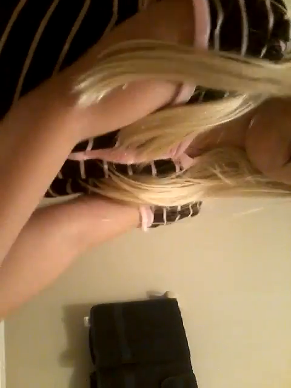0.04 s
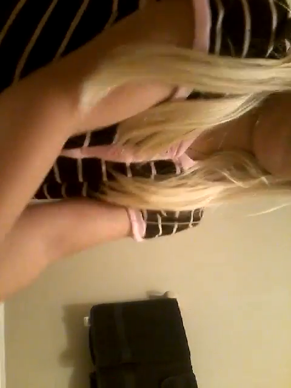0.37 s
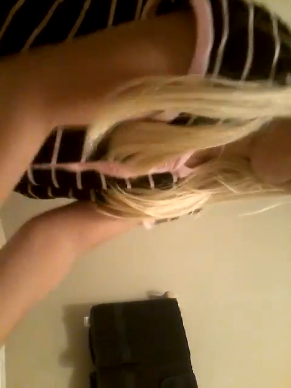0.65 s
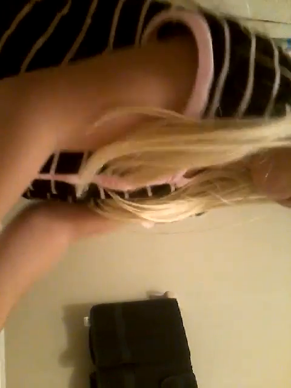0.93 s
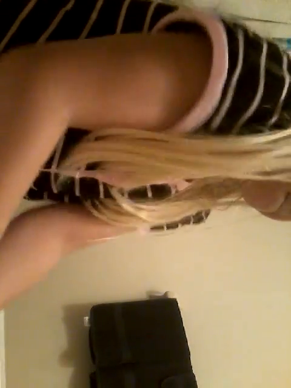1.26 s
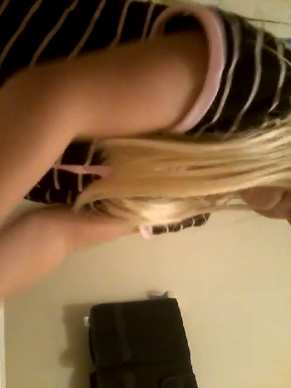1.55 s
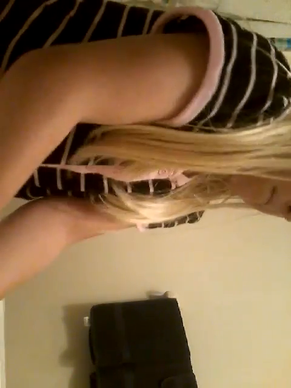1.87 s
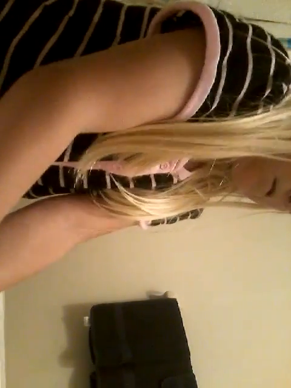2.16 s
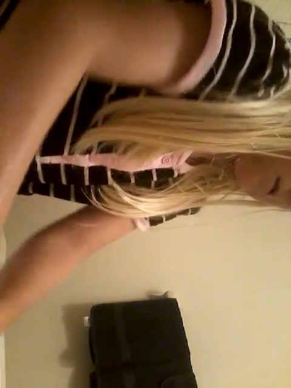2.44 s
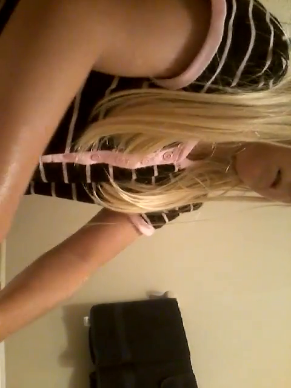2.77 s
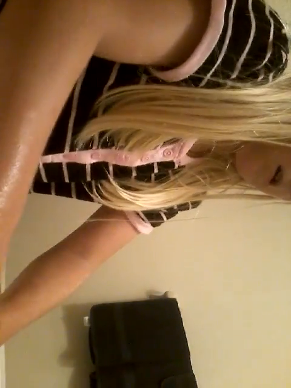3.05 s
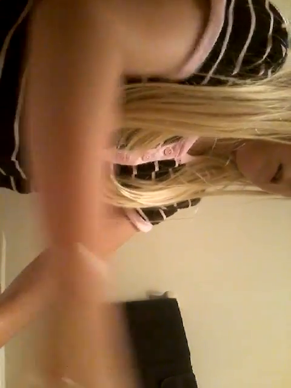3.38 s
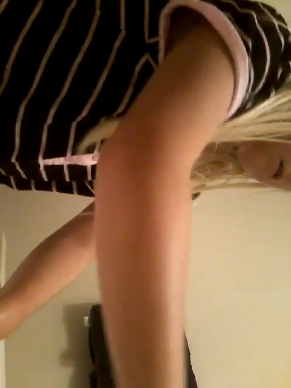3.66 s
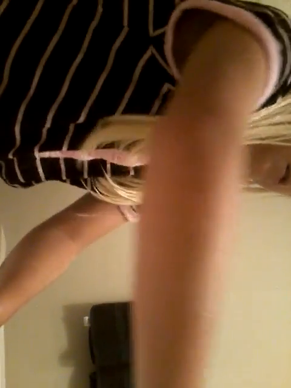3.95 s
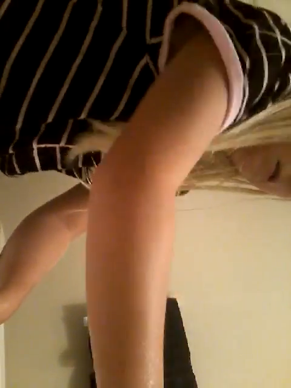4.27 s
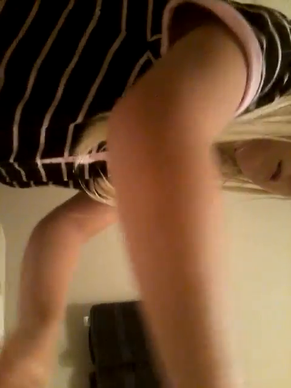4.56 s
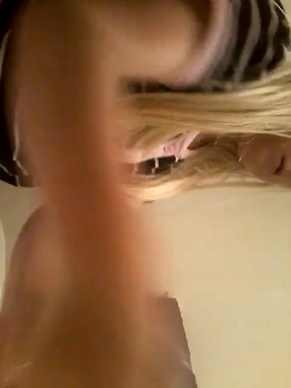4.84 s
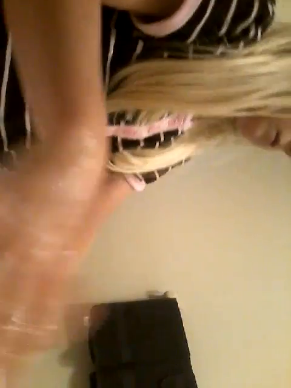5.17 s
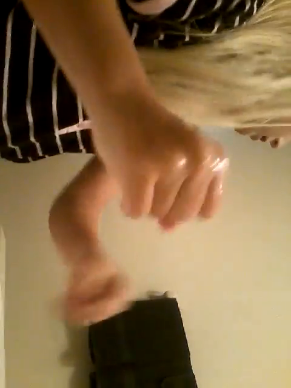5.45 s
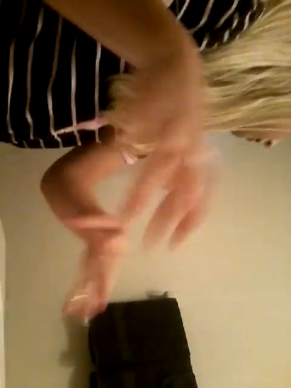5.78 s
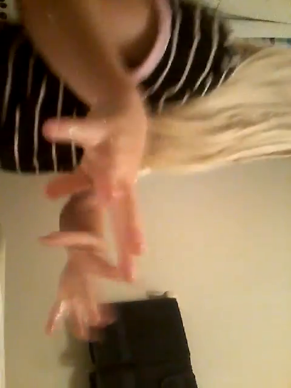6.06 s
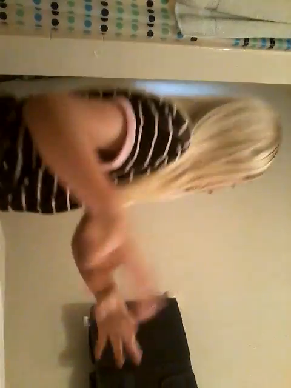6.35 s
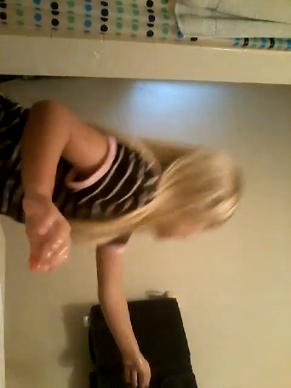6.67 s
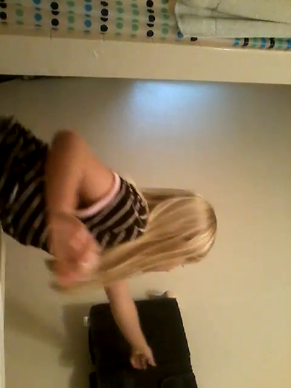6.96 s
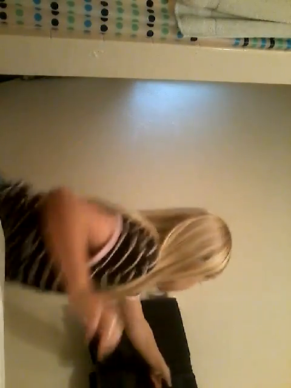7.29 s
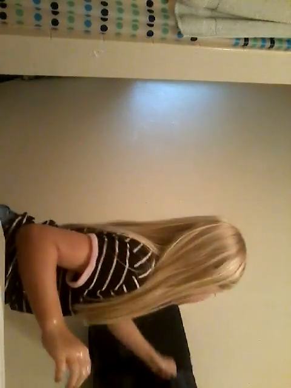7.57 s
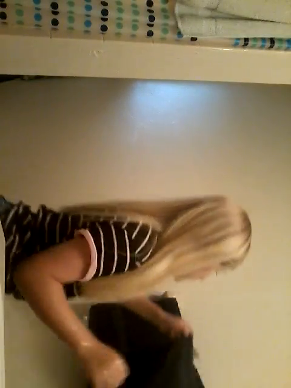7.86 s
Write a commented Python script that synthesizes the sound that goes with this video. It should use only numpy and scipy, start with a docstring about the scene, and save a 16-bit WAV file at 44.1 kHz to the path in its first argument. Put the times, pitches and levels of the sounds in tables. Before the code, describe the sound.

From the start, tap water spatters and drums steadily on a basin, heard close up in a small bathroom with a short echo. Hands rinse under it with irregular splashes, bubbles and wet squelches, and something knocks the basin at about 1 second. The loudest moment comes around 2 seconds, when a handful of water drops with a hollow slosh and sharp spurts. Between 3.7 and 4.7 seconds the tap handles give several dull clunks. The flow falls away at 4 seconds, leaving drips and a soft drain gurgle until about 5. Shaken hands then flick drops that tick right by the microphone, from 5.3 to 6.2 seconds, with very faint rubbing. Near 7.6 seconds a wall fitting judders with a quick run of ringing clacks and a tiny groan, along with a soft towel rustle. A faint hiss and low hum lie underneath throughout.

```python
"""A small bathroom with hard walls: hands are rinsed under a tap, close to a phone on the counter.
The jet spatters and drums on the basin, handfuls of water splash, and trapped air rings as bubbles.
The tap is shut, the last water drips and drains, and shaken hands flick drops beside the phone.
As the towel is reached for, a wall fitting judders and groans. Under it all lie a faint hiss and hum."""
import sys
import numpy as np
from scipy import signal
from scipy.fft import rfft, irfft
from scipy.io import wavfile
from scipy.ndimage import uniform_filter1d

SR = 44100
rng = np.random.default_rng(int(sys.argv[2]) if len(sys.argv) > 2 else 0)


def dump(signal):
    """Clip the signal to [-1, 1] and save it as 16-bit WAV at the path in sys.argv[1]."""
    limited = np.clip(np.atleast_2d(signal).T, -1, 1)
    pcm = np.round(limited * 32767).astype(np.int16)
    wavfile.write(sys.argv[1], SR, pcm)


N = 349272
TIME = np.arange(N) / SR
TOP_HZ = 15950  # the highest pitch the phone picks up


def undb(db):
    """Turn decibels into a number to multiply by."""
    return 10 ** (np.asarray(db) / 20)


def unit(x):
    """Scale a sound to an average strength (rms) of 1."""
    return x / np.sqrt(np.mean(x ** 2))


def at_level(x, db, size=110):
    """Scale a short sound so that its loudest few milliseconds have this level."""
    return x * undb(db) / np.sqrt(uniform_filter1d(x ** 2, size, mode="constant").max())


def add(out, start, x):
    """Mix x into out, beginning at start seconds."""
    i = int(start * SR)
    out[i:i + len(x)] += x[:N - i]


def colour(x, tone, size=4096):
    """Make some pitches louder and others softer, along a curve of (f/Hz, gain/dB) points."""
    hz, db = np.transpose(tone)
    log_gain = np.log(undb(np.interp(np.log(np.fft.rfftfreq(size, 1 / SR) + 1), np.log(hz), db)))
    cepstrum = irfft(log_gain)
    cepstrum[1:size // 2] *= 2  # folded so that the filter never sounds ahead of a hit
    cepstrum[size // 2 + 1:] = 0
    return signal.fftconvolve(x, irfft(np.exp(rfft(cepstrum))))[:len(x)]


def ring(x, hz, width):
    """Let a sound ring at one pitch; a narrower width rings longer."""
    return signal.lfilter(*signal.iirpeak(hz, hz / width, fs=SR), x)


def keep_side(x, hz, kind, order=2):
    """Keep the "low" or the "high" side of a cutoff pitch."""
    return signal.sosfilt(signal.butter(order, min(hz, TOP_HZ), kind, fs=SR, output="sos"), x)


def wander(rate):
    """A smooth random curve that takes a new value about rate times a second."""
    hold = int(SR / rate)
    steps = np.repeat(rng.standard_normal(N // hold + 1), hold)
    return unit(uniform_filter1d(uniform_filter1d(steps, hold), hold)[:N])


def impacts(n, per_second, spread_db):
    """Tiny hits at random moments, a few much larger than the rest."""
    size_db = spread_db * np.minimum(rng.exponential(size=n), 4)
    return (rng.random(n) < per_second / SR) * rng.choice([-1, 1], n) * undb(size_db)


def burst(fade):
    """A ragged burst of droplets that starts at once and dies away in clumps."""
    t = TIME[:SR // 5]
    swell = np.exp(-t / fade) * (1 - np.exp(-t / .0007))
    clumps = np.interp(t, t[::130], rng.standard_normal(len(t[::130])))
    return impacts(len(t), 6000, 1.8) * swell * undb(1.5 * clumps)


def bubble(hz, t60, rise=0.093):
    """An air pocket rings and rises in pitch as it surfaces; t60 is the seconds it takes to fade 60 dB."""
    t = TIME[:SR // 10]
    pitch = hz * (1 + rise * np.minimum(t / t60, 1))
    return np.sin(2 * np.pi * np.cumsum(pitch) / SR) * undb(-60 * t / t60)


def pop(hz, t60, db, scatter):
    """A trapped air pocket bursts and breaks into six smaller ones of nearby pitch."""
    cluster = bubble(hz, t60)
    for lag, detune in rng.random((6, 2)):
        piece = bubble(hz * (1 + scatter) ** (2 * detune - 1), t60)
        cluster += np.exp(-lag) * np.roll(piece, int(lag * t60 * 0.66 * SR))
    # a bubble gives off little sound far from its pitch
    return at_level(keep_side(keep_side(cluster, hz, "high", order=3), 1.5 * hz, "low"), db)


def gurgle(start, end, low_hz, high_hz, start_db, end_db, cycles, count):
    """Lone bubbles of all sizes, scattered over a stretch of time."""
    out = np.zeros(N)
    for when, pitch, size in rng.random((count, 3)):
        hz = low_hz * (high_hz / low_hz) ** pitch
        db = start_db + (end_db - start_db) * when - 14 * np.sqrt(size)
        add(out, start + (end - start) * when, undb(db) * bubble(hz, cycles / hz))
    return out


def cloud(length, low_hz, high_hz, cycles, count):
    """A short, dense swarm of bubbles between two pitches."""
    out = np.zeros(SR // 2)
    for k, (when, pitch, size) in enumerate(rng.random((count, 3))):
        hz = low_hz * (high_hz / low_hz) ** pitch
        add(out, length * (k + when) / count, undb(-10 * size) * bubble(hz, cycles / hz))
    return out


def room(x, echo_db=-4.5, low_t60=0.43, treble_t60=0.28):
    """The sound plus dense echoes from near walls; the treble dies a little sooner."""
    t = TIME[:SR // 2]
    noise = rng.standard_normal(len(t))
    low = keep_side(noise, 1400, "low", order=1)
    tail = low * undb(-60 * t / low_t60) + (noise - low) * undb(-60 * t / treble_t60)
    tail *= np.clip(t / 0.0059 - .5, 0, 1)  # the first echoes take a moment to arrive
    return x + undb(echo_db) * signal.fftconvolve(x, tail / np.sqrt(np.sum(tail ** 2)))[:N]


def air():
    """Faint hiss and a low, wavering hum at a pitch where the room rings."""
    # tone of the hiss: f/Hz, gain/dB
    hiss_tone = [(15, -43.5), (25, -12), (43, -20.5), (110, -4.5), (133, 2), (184, -9.5), (361, -13.5),
                 (710, -29), (1590, -33.5), (2090, -32.5), (3050, -36.5), (6660, -33), (8270, -37),
                 (14600, -40.5), (15800, -44.5)]
    hiss = unit(colour(rng.standard_normal(N), hiss_tone)) * undb(-55)
    hum = unit(ring(ring(rng.standard_normal(N), 134, 22), 134, 22))
    running = np.interp(TIME, [3.4, 5.0], [1, 0])  # running water feeds the hum
    return hiss + hum * undb(-61 + 16.4 * running)


def rubbing():
    """Wet hands, sleeves and towel slide in tiny random slips, each stroke swelling and fading."""
    # strokes: middle t/s, level/dB, half length/s
    strokes = [(4.958, -58.5, 0.041), (5.219, -63.5, 0.099), (5.714, -62, 0.13), (6.876, -65, 0.056),
               (7.414, -60, 0.055), (7.665, -50.5, 0.03), (7.767, -52, 0.14)]
    # tone of the rustle: f/Hz, gain/dB
    rustle_tone = [(300, 3.5), (1000, -3), (2200, -12.5), (4000, -8.5), (6800, 2.5), (8500, -10.5),
                   (15000, -19)]
    swell = sum(undb(db) * np.exp(-((TIME - middle) / half) ** 2) for middle, db, half in strokes)
    return unit(colour(room(impacts(N, 2500, 2.1)), rustle_tone)) * swell


def fitting_groan():
    """The wall fitting's joint rubs as it turns, with a soft tone that sags and rises again."""
    # course of the groan: t/s, f/Hz, level/dB
    course = [(7.648, 613, -62), (7.658, 542, -50), (7.677, 495, -47), (7.703, 508, -49), (7.728, 585, -62)]
    times, hz, db = np.transpose(course)
    phase = 2 * np.pi * np.cumsum(np.interp(TIME, times, hz)) / SR
    return unit(np.sin(phase)) * np.interp(TIME, times, undb(db), left=0, right=0)


def fitting_judder():
    """The wall fitting is pulled and catches several times; each catch clacks and sets it ringing."""
    # catches: t/s, level/dB
    catches = [(7.642, -37), (7.6465, -39.5), (7.653, -32.5), (7.668, -38), (7.683, -46), (7.696, -44),
               (7.754, -53)]
    # pitches the fitting rings at: f/Hz, width/Hz, gain/dB
    fitting_notes = [(139, 5, 8), (209, 20, 7.5), (254, 4.7, 8), (360, 52, -4.5), (770, 39, -12),
                     (1000, 41, -21), (1275, 9.5, -8), (2230, 50, -11), (2840, 35, -10), (3560, 30, -14),
                     (4130, 40, -11), (4690, 47, -12)]
    out, t = np.zeros(N), TIME[:SR // 2]
    for start, db in catches:
        scrape = rng.standard_normal(len(t)) * np.exp(-t / 0.0047)
        push = scrape + 3 * np.sqrt(np.sum(scrape ** 2)) * (t == 0)
        body = sum(undb(gain) * ring(push, hz, width) for hz, width, gain in fitting_notes)
        clack = undb(-14) * keep_side(keep_side(scrape, 5000, "low", order=3), 2200, "high")
        add(out, start, at_level(keep_side(body + clack, 65, "high", order=3), db))
    return out


def flicks(gap_s=0.0099, trail_db=-13.5, loss_db=2):
    """Drops flicked beside the phone tick without echo; three ever softer droplets trail each one."""
    # landings: t/s, level/dB, treble cutoff/Hz
    landings = [(5.272, -41.5, 6000), (5.309, -55.5, 2500), (5.654, -59, 12000), (5.701, -48.5, 14800),
                (5.752, -52, 2510), (6.146, -46, 3960), (6.1485, -31.5, 2780), (6.1684, -32.5, 8860),
                (6.205, -48.5, 4940)]
    # tone of a very near drop: f/Hz, gain/dB
    drop_tone = [(100, -16.5), (400, -2.5), (1000, -4.5), (2000, -3), (3200, -10.5), (6000, -1.5),
                 (8000, -8), (16000, -17)]
    out, t = np.zeros(N), TIME[:SR // 20]
    for start, db, cutoff in landings:
        lags = np.cumsum(gap_s * (.5 + rng.random(3)))
        trail = [(lag, trail_db - k * loss_db) for k, lag in enumerate(lags)]
        for lag, drop_db in [(0.0011, 0.0024)] + trail:
            fade = np.exp(-t / 0.00066) + undb(-19) * np.exp(-t / 0.011)
            tick = colour(rng.standard_normal(len(t)) * fade, drop_tone)
            add(out, start + lag, at_level(keep_side(tick, cutoff, "low"), db + drop_db))
    return out


def tap_knocks():
    """The tap's handles give short, dead clunks as they are gripped and turned to their stops."""
    # clunks: t/s, level/dB, treble cutoff/Hz
    clunks = [(3.723, -29, 270), (3.774, -36, 304), (4.2449, -27.5, 1300), (4.595, -42, 900),
              (4.641, -34.5, 2970), (4.667, -35, 1100)]
    # tone of a knocked handle: f/Hz, gain/dB
    handle_tone = [(70, -12), (150, 2.5), (400, 0.5), (800, -4.5), (1200, -2.5), (1600, -17), (3800, -16),
                   (7000, -12)]
    out, t = np.zeros(N), TIME[:SR // 10]
    for start, db, cutoff in clunks:
        blow = rng.standard_normal(len(t)) * np.exp(-t / 0.004)
        blow[0] += 8  # the sharp first contact
        add(out, start, at_level(keep_side(colour(blow, handle_tone), cutoff, "low", order=1), db))
    return out


def basin_knocks():
    """Hands and water hit the basin and counter; the basin rings, after soft blows only at low pitches."""
    # blows: t/s, level/dB, treble cutoff/Hz
    blows = [(0.636, -30, 190), (.762, -31.5, 139), (1.0507, -17, 4000), (1.060, -27, 3500),
             (1.368, -28.5, 161), (1.455, -30.5, 220), (3.445, -37, 150), (4.16, -40.5, 298)]
    # pitches the basin rings at: f/Hz, width/Hz, gain/dB
    basin_notes = [(127, 33.6, 4), (223, 59, 1), (355.5, 59, 2), (485, 17, -3), (980, 50, 1), (1184, 31, 8),
                   (1715, 35, -4.5), (2000, 70, -0.5), (2940, 60, 5), (3260, 70, 5)]
    out, t = np.zeros(N), TIME[:SR // 3]
    for start, db, cutoff in blows:
        fade = 0.0049 * (150 / cutoff) ** 0.35  # harder blows are shorter
        push = rng.standard_normal(len(t)) * np.exp(-t / fade)
        push[0] += 2.2 * np.sqrt(np.sum(push ** 2))
        body = sum(undb(gain) * ring(push, hz, width) for hz, width, gain in basin_notes)
        knock = keep_side(body + undb(-34) * push, cutoff, "low")
        add(out, start, at_level(keep_side(knock, 115, "high", order=6), db, size=300))
    return out


def gulps():
    """Large air pockets give short, low, hollow notes, in a dumped handful and later in the drain."""
    # air pockets: t/s, level/dB, f/Hz
    pockets = [(1.932, -25, 373.5), (2.030, -24, 365), (2.031, -27, 477), (4.560, -44, 280),
               (4.602, -37.5, 253)]
    out = np.zeros(N)
    for start, db, hz in pockets:
        add(out, start, pop(hz, t60=0.059, db=db, scatter=0.046))
    return out


def drips(cycles=40):
    """Each drop traps a bubble that rings for the same number of cycles, so high plinks are shorter."""
    # drops: t/s, level/dB, f/Hz
    drops = [(.760, -27, 2105), (1.125, -29.5, 2020), (1.558, -35, 2020), (1.572, -36, 2290),
             (2.001, -31, 2064), (2.009, -31, 3290), (2.016, -26, 4130), (2.695, -37.5, 2315),
             (4.261, -50, 12400), (4.287, -37.5, 5650), (4.453, -31.5, 5670), (4.541, -52, 6300),
             (4.612, -50, 3550), (4.666, -49, 4560), (4.724, -52.5, 2060), (4.748, -49, 5400)]
    out = np.zeros(N)
    for start, db, hz in drops:
        add(out, start, pop(hz, cycles / hz, db, scatter=.04))
    return out


def pool():
    """Bubbles burst in the water under the tap, then thin out as it drains."""
    running = gurgle(0, 4, 1800, 7500, start_db=-34, end_db=-33, cycles=36, count=260)
    filling = gurgle(2.6, 4, 1100, 4500, start_db=-34, end_db=-33, cycles=30, count=70)
    foam = gurgle(3.4, 4.06, 8500, 14000, start_db=-35, end_db=-31, cycles=50, count=220)
    last_foam = gurgle(4.05, 4.7, 9000, 13000, start_db=-41, end_db=-47, cycles=80, count=16)
    draining = gurgle(4.25, 4.8, 1900, 5500, start_db=-43, end_db=-40, cycles=35, count=36)
    glugs = gurgle(4.62, 4.82, 260, 2000, start_db=-40, end_db=-47, cycles=12, count=24)
    return running + filling + foam + last_foam + draining + glugs


def bubble_swarms(pitch_spread=1.3):
    """A dumped handful sloshes with large bubbles, cupped hands gurgle and foam fizzes."""
    # the stream runs into cupped hands: t/s, level/dB, length/s, middle f/Hz
    pours = [(0.552, -34.5, 0.047, 4250), (0.622, -36.5, 0.033, 6230), (2.70, -37, 0.13, 3620),
             (3.136, -31.5, .03, 6400), (3.391, -38.5, 0.044, 5100)]
    # whipped-up foam bursts in tiny bubbles: t/s, level/dB, length/s
    fizzes = [(1.78, -26, .008), (1.922, -30, .03), (2.048, -21.5, 0.054), (3.913, -30.5, 0.023)]
    out = gurgle(2.03, 2.09, 900, 1230, start_db=-12.5, end_db=-25.5, cycles=35, count=16)  # the slosh
    for start, db, length, hz in pours:
        swarm = cloud(length, hz / pitch_spread, hz * pitch_spread, cycles=30, count=20)
        add(out, start, at_level(swarm, db))
    for start, db, length in fizzes:
        add(out, start, at_level(cloud(length, 8500, 13500, cycles=41, count=50), db))
    return out


def squelches():
    """Wet palms squeeze out air; their hollow rings at three pitches, the higher ones dying sooner."""
    # squeezes: t/s, level/dB, low f/Hz, middle f/Hz, high f/Hz, t60/s, treble lift/(dB per octave)
    squeezes = [(.759, -24, 2120, 3200, 5200, 0.0097, 3.5), (1.051, -17.5, 2030, 3080, 5200, .012, 2.5),
                (1.342, -28.5, 2530, 3760, 6430, 0.0076, 2.5),
                (1.666, -14.5, 2200, 3020, 5400, 0.0066, 4.5), (2.160, -18, 2600, 3880, 6060, 0.0072, 13),
                (4.046, -33, 2470, 3110, 6100, .008, 2)]
    # strength of the hollow's low, middle and high note: gain/dB
    note_gains = [-3, 0, -3]
    out = np.zeros(N)
    for start, db, low_hz, middle_hz, high_hz, t60, lift in squeezes:
        scatter = .0014 / t60  # shorter squelches are less clear in pitch
        notes = sum(pop(hz, t60 * np.sqrt(low_hz / hz), gain + lift * np.log2(hz / low_hz), scatter)
                    for hz, gain in zip((low_hz, middle_hz, high_hz), note_gains))
        add(out, start, at_level(notes, db))
    return out


def splashes(splat_fade_s=0.005, splat_width_hz=1800):
    """A splash is a bright spray plus a duller slap; spurts are finer spray, splats a thin spit of it."""
    # water thrown off the hands: t/s, spray level/dB, slap level/dB, fade/s
    throws = [(.775, -24, -41, 0.0033), (0.931, -23.5, -37, 0.0067), (1.021, -27.5, -34.5, 0.025),
              (1.201, -24, -42, 0.014), (1.261, -20, -46, 0.0035), (1.455, -28, -34, 0.028),
              (1.666, -24, -31, 0.0032), (1.784, -21, -31.5, 0.014), (1.893, -23.5, -27.5, 0.022),
              (1.930, -21.5, -31, 0.033), (2.015, -24, -35, 0.011), (2.029, -16, -27, 0.017),
              (2.146, -16, -25.5, 0.0029), (2.2966, -21, -24.5, 0.005), (2.304, -18, -22, 0.0021),
              (3.773, -27.5, -42, 0.0045), (3.912, -30, -52, .005), (4.047, -29.5, -65, 0.01),
              (4.118, -24.5, -61, 0.0088), (4.452, -37, -56, .004), (4.558, -35, -52, 0.0023),
              (4.639, -40.5, -39, 0.0018)]
    # water squeezed out between the hands: t/s, level/dB, fade/s
    spurts = [(2.053, -20.5, 0.035), (2.083, -18, 0.024), (2.106, -13, 0.014)]
    # stray drops on wet skin: t/s, level/dB, f/Hz
    splats = [(.305, -29, 6400), (.356, -29.5, 5600), (.519, -27.5, 6000), (2.394, -32.5, 8300),
              (2.425, -26.5, 6750), (2.594, -27.5, 6100), (2.721, -29, 6300), (3.086, -29, 6800),
              (3.126, -28.5, 7400), (3.624, -28.5, 6660), (3.844, -30, 7250), (4.076, -28, 7000)]
    # tones of the spray, the slap and the spurt: f/Hz, gain/dB
    spray_tone = [(500, -29), (2000, -24.5), (4000, -10), (5700, 0.5), (7000, 1.5), (9000, -11.5),
                  (12000, -14.5), (16000, -35)]
    slap_tone = [(40, -40), (150, -20.5), (500, -8.5), (1150, -1.5), (1500, -1.5), (2300, -2), (3300, -4),
                 (5000, -0.5), (9000, -30)]
    spurt_tone = [(1000, -26.5), (4500, -13.5), (5800, -2), (6400, -2.5), (6900, 8), (7600, -5), (8500, -3),
                  (9500, -16), (12500, -15.5), (15500, -32)]
    out = np.zeros(N)
    for start, spray_db, slap_db, fade in throws:
        add(out, start, at_level(colour(burst(fade), spray_tone), spray_db))
        add(out, start, at_level(colour(burst(fade), slap_tone), slap_db))
    for start, db, fade in spurts:
        add(out, start, at_level(colour(burst(fade), spurt_tone), db))
    for start, db, hz in splats:
        spit = ring(burst(splat_fade_s), hz, splat_width_hz)
        add(out, start, at_level(ring(spit, hz, splat_width_hz), db))
    return keep_side(out, 120, "high")


def flow(open_db, trickle_db, fall_db_per_s=78, closing_s=3.975):
    """The strength of the water: once the tap is turned down it falls to a trickle, then runs dry."""
    db = np.maximum(open_db - fall_db_per_s * np.maximum(TIME - closing_s, 0), trickle_db)
    return undb(db) * np.interp(TIME, [4.13, 5.16], [1, 0])


def jet():
    """Droplets and tiny ringing bubbles spatter over the nozzle's fizz; the stream drums on the basin."""
    # tones of the spatter and the drumming: f/Hz, gain/dB
    spatter_tone = [(350, -41), (600, -8), (768, -5.5), (956, -10), (1130, -6), (1500, -15.5), (2060, -7),
                    (2490, -8), (2980, -13.5), (3230, -7.5), (3910, -8), (6950, 1.5), (9390, -9.5),
                    (11700, -10.5), (15800, -28)]
    drum_tone = [(30, -23.5), (55, -18.5), (90, -4.5), (135, -2.5), (165, -3.5), (230, -1), (300, -1),
                 (375, 3), (460, -0.5), (560, -13.5), (800, -18.5), (1400, -30)]
    # parts of the spatter that swell and sink as the hands move: f/Hz
    swell_pitches = [2200, 3500, 5540]
    # the fine, high spatter while the tap is open: t/s, level/dB
    fine_levels = [(0, -35), (.15, -37), (.27, -42.5), (.45, -38.5), (1.2, -36.5), (1.63, -43), (2.52, -38),
                   (2.72, -34.5), (3.26, -38.5), (3.65, -34.5), (3.96, -35.5)]
    froth = sum(unit(ring(impacts(N, 45, 5.5), hz, hz / 18)) * np.sqrt(hz)
                for hz in np.geomspace(900, 13000, num=28))
    droplets = undb(1.5) * unit(impacts(N, 900, 3.8))
    fizz = undb(5.5) * rng.standard_normal(N)
    flicker = undb(1.8 * wander(60))
    water = colour(room((droplets + unit(froth) + fizz) * flicker), spatter_tone)
    water += sum(ring(water, hz, hz / 2) * (undb(1.2 * wander(10)) - 1) for hz in swell_pitches)
    fine_db = np.interp(TIME, *np.transpose(fine_levels))
    fine = unit(keep_side(water, 3600, "high", order=3)) * flow(fine_db, -59.5)
    # the big droplets stop sooner as the pressure falls
    coarse = unit(keep_side(water, 4000, "low", order=3)) * flow(-43, -58, fall_db_per_s=155)
    drum = unit(colour(impacts(N, 700, 1.9), drum_tone)) * flow(-44, -51)
    return fine + coarse + drum


def scene():
    """All the sounds and their echoes, heard at one microphone."""
    around_basin = splashes() + pool() + bubble_swarms() + gulps() + basin_knocks() + tap_knocks()
    pops = room(squelches() + drips(), echo_db=-1)
    mix = jet() + room(around_basin + fitting_judder() + fitting_groan()) + pops
    return (mix + flicks() + rubbing() + air())[None]


def record(dry):
    """The phone cuts off the very highest treble."""
    return signal.sosfilt(signal.ellip(10, .2, 80, TOP_HZ, fs=SR, output="sos"), dry)


dry = scene()
out = record(dry)
dump(out)
```